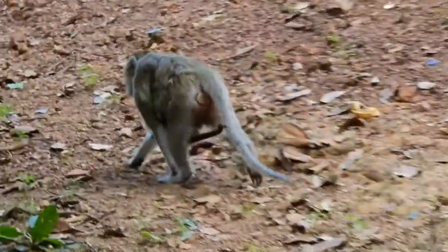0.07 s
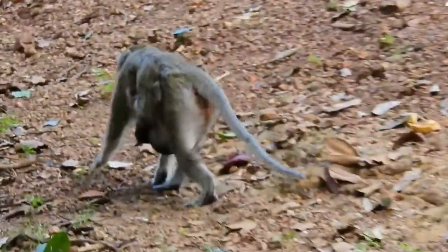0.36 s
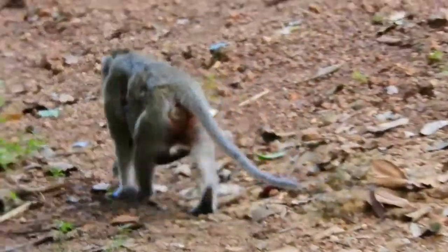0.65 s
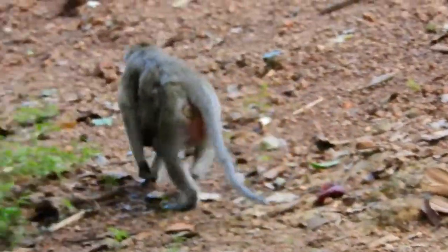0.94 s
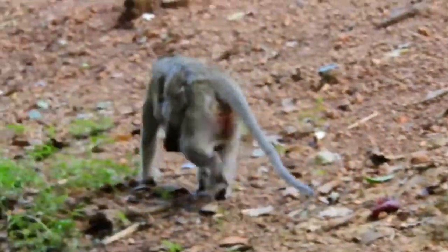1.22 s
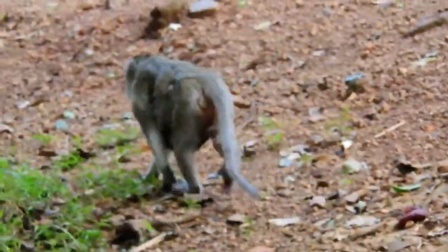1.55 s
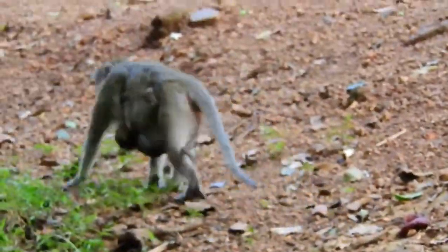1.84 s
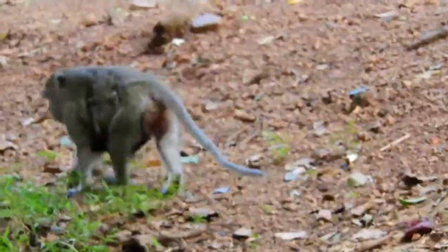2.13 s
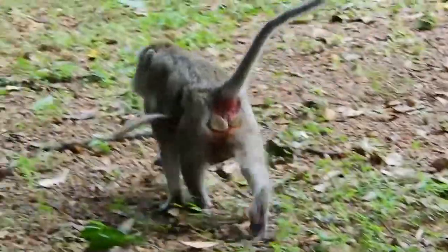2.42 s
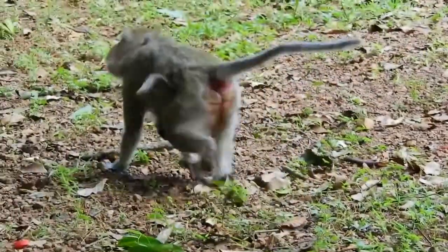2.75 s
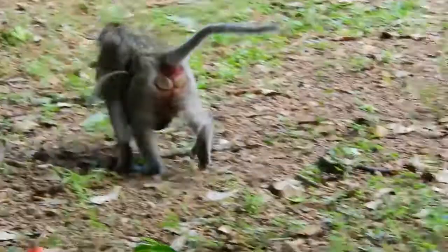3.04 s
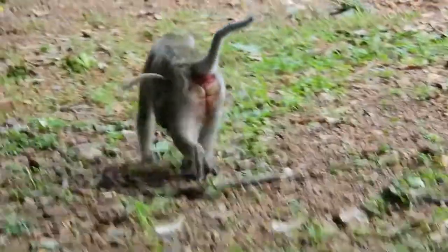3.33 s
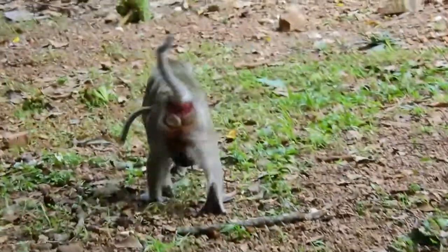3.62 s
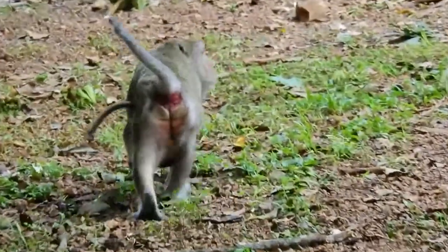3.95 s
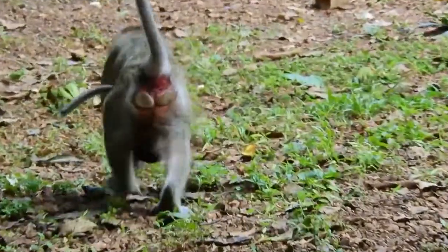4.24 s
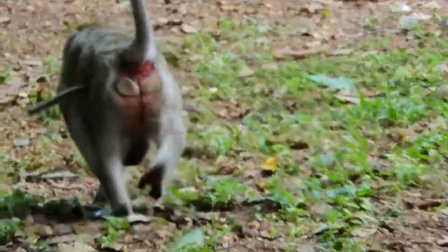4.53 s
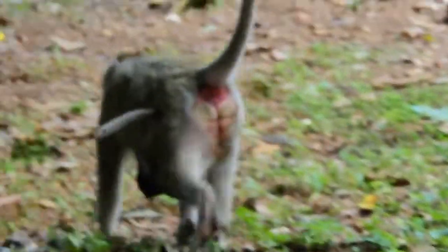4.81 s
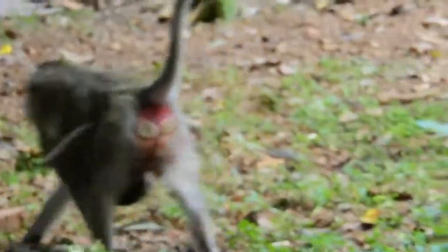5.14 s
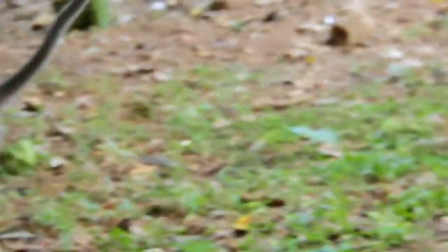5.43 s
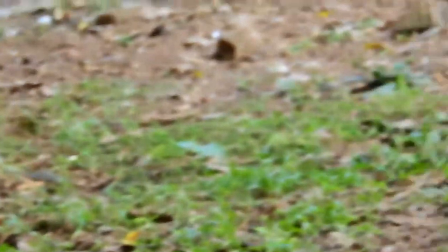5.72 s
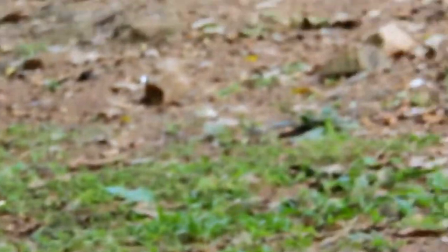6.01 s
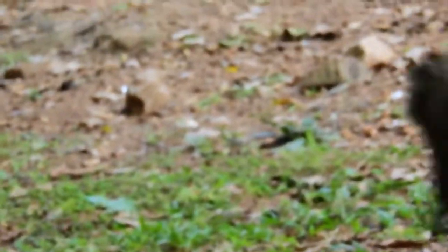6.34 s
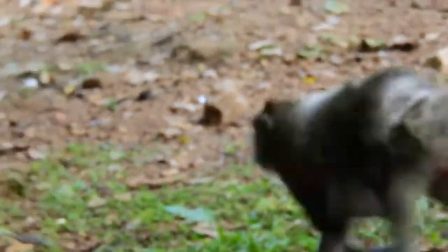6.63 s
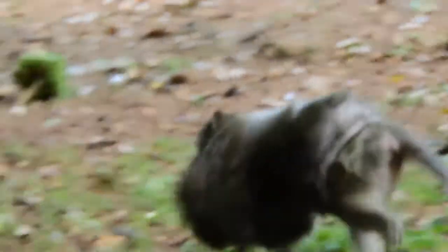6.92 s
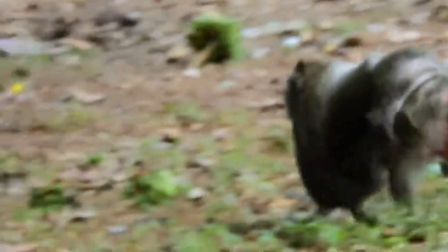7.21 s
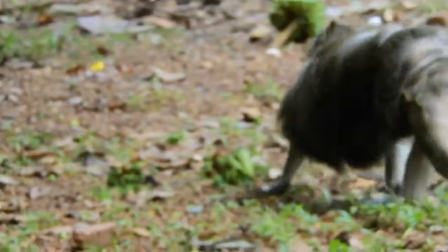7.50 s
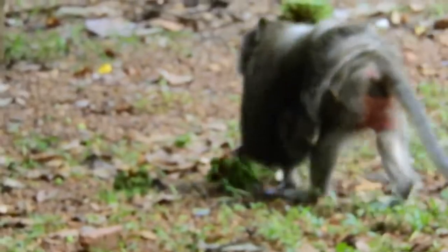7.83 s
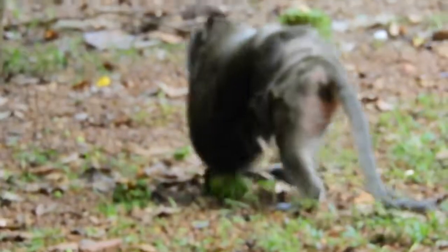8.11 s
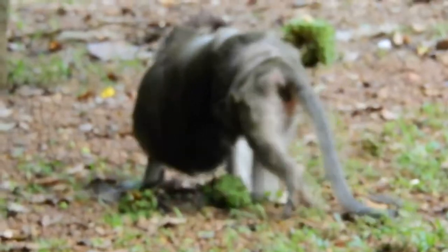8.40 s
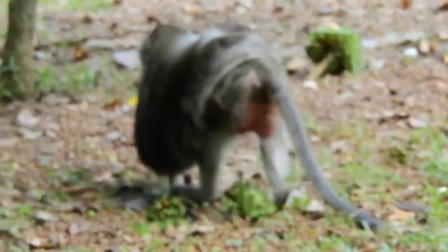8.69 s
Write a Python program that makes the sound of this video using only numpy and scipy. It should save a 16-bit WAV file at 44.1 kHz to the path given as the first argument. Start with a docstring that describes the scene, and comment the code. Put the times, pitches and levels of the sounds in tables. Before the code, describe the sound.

Outdoors among trees, distant traffic rumbles under a high hiss and a steady, shrill insect chorus. A far bird whistles once, faintly, at about 1.7 seconds. At 1.8 seconds everything cuts to silence, snapping back at 2.3 seconds with louder hiss and a single-cylinder motorbike some way off. Its slow, lumpy thump swells and sinks about once a second. Tyre roar builds, peaks around 4.5 to 5 seconds and shifts to the right, with a low boom lasting until about 6 seconds. A second motorbike with a quicker, tighter putter emerges near 5.5 seconds and passes at about 6.6, easing off as the tyre roar fades. The first drops away at 8 seconds, while the second putters loudest from there to the end, just before 9 seconds. From 2.4 seconds on, dry leaves tick occasionally nearby, joined by a few thin, raspy insect chirps between 4 and 8.5 seconds.

```python
"""Far traffic rumbles under a high hiss; in the trees insects shrill and a distant bird whistles once.
At 1.8 s the sound cuts out for half a second. Then two single-cylinder motorbikes roll past some
way off, their firings ringing the exhaust pipes as their tyre roar swells and fades.
The first thumps slowly and booms when close; dry leaves tick and insects chirp nearby.
The second, quicker and easing off, putters loudest at the end."""
import sys
import numpy as np
from scipy import signal
from scipy.fft import rfft, irfft
from scipy.io import wavfile
from scipy.ndimage import uniform_filter1d

SR = 44100
rng = np.random.default_rng(int(sys.argv[2]) if len(sys.argv) > 2 else 0)


def unload_audio(sound):
    """Save the sound as a 16-bit wav file, at the path given as the first command line argument."""
    columns = np.transpose(np.atleast_2d(sound))
    # keep every value between -1 and 1, then stretch to whole-number steps
    steps = np.round(np.clip(columns, -1, 1) * 32767)
    wavfile.write(sys.argv[1], SR, steps.astype(np.int16))


N = 386316
MUTE_FROM_S, MUTE_TO_S = 1.803, 2.306
FRAME, HOP = 1024, 256
TIME = np.arange(N) / SR
FRAME_TIME = np.arange(N // HOP + 2) * HOP / SR
BIN_HZ = np.maximum(np.fft.rfftfreq(FRAME, 1 / SR), 1)[:, None]
FINE_HZ = np.maximum(np.fft.rfftfreq(N, 1 / SR), 1)


def undb(db):
    """Decibels to gain."""
    return 10 ** (np.asarray(db) / 20)


def unit(x):
    """Scale to rms 1."""
    return x / np.sqrt(np.mean(x ** 2))


def colour(points, hz=FINE_HZ):
    """Gain through (Hz, dB) points, falling 30 dB per octave past the ends."""
    point_hz, db = np.transpose(points)
    octaves_outside = np.abs(np.log2(hz / np.clip(hz, point_hz[0], point_hz[-1])))
    return undb(np.interp(np.log(hz), np.log(point_hz), db) - 30 * octaves_outside)


def resonance(hz, width_hz):
    """Response of a band-pass applied twice."""
    return (1 + 1j * (FINE_HZ ** 2 - hz ** 2) / (FINE_HZ * width_hz)) ** -2


def through(x, response):
    """Filter by a frequency response."""
    return irfft(rfft(x) * response, N)


def walk(rate_hz):
    """Random steps smoothed twice; spread near 1."""
    hold = int(SR / rate_hz)
    steps = np.repeat(rng.standard_normal(N // hold + 1), hold)
    return 1.8 * uniform_filter1d(uniform_filter1d(steps, hold), hold)[:N]


def stereo_noise(wide_hz, bass_side):
    """Noise with channels alike in the bass, unrelated well above wide_hz."""
    mid, side = rng.standard_normal((2, N))
    share = np.clip(bass_side + FINE_HZ / (FINE_HZ + wide_hz), 0, 1)
    return mid + through(side, np.sqrt(share)) * np.array([[1], [-1]])


def panned(x, left_db):
    """Lean a sound to the left."""
    return x * undb(np.array([[.5], [-.5]]) * left_db)


def nearness(closest_s, width_s, t=TIME):
    """Inverse-square swell: 1 at closest_s, half at width_s either side."""
    return 1 / (1 + ((t - closest_s) / width_s) ** 2)


def crossover(middle_s, width_s, t=TIME):
    """Smooth step from 0 to 1."""
    return .5 + .5 * np.tanh((t - middle_s) / width_s)


# Traffic spectra before and after the silence: (frequency [Hz], level [dB])
TRAFFIC_EARLY_SPECTRUM = [(20, -17.5), (35, -11.5), (52, -2.5), (85, -0.5), (140, 2.5), (200, -5),
                          (270, -9.5), (380, -17.5), (700, -18.5), (1300, -19.5), (2000, -26), (3000, -30),
                          (4100, -36), (6000, -35.5)]
TRAFFIC_LATE_SPECTRUM = [(20, -22), (38, -12), (55, 2), (82, 2.5), (150, -2.5), (270, -7), (400, -18),
                         (700, -34)]

def far_traffic(early_db=-29, sag_db_per_s=1.0, late_db=-33, swell_db=2.5, crest_s=6.46, throb_db=2.0):
    """Far engines blur into a throbbing rumble that sinks, later swells and ebbs."""
    early = unit(through(stereo_noise(wide_hz=10000, bass_side=.012), colour(TRAFFIC_EARLY_SPECTRUM)))
    late = unit(through(stereo_noise(wide_hz=16000, bass_side=.066), colour(TRAFFIC_LATE_SPECTRUM)))
    swell = np.interp(TIME - crest_s, [-1.0, 0, 4.4], [0, 1, 0])
    early *= undb(early_db - sag_db_per_s * TIME + .5 * walk(18))
    late *= undb(late_db + swell_db * swell + throb_db * walk(20))
    return np.where(TIME < MUTE_TO_S, early, late)


# High, steady hiss with a faint top edge: (frequency [Hz], level [dB])
HISS_SPECTRUM = [(3180, -9), (5400, 4), (7540, 3.5), (8640, 8), (9140, 7.5), (11000, -5), (11900, -22),
                 (13000, -20.5), (15000, -37.5)]

def high_hiss(early_db=-46, early_sag_db_per_s=3.0, late_db=-36, late_sag_db_per_s=.66):
    """Wide, sinking hiss: one early rustle, louder after the silence, a swell as the bikes pass."""
    hiss = unit(through(stereo_noise(wide_hz=1497, bass_side=.026), colour(HISS_SPECTRUM)))
    rustle_db = 3 * nearness(.55, .049)
    swell_db = 4 * nearness(5.12, .78)
    level_db = np.where(TIME < MUTE_TO_S, early_db - early_sag_db_per_s * TIME + rustle_db,
                        late_db - late_sag_db_per_s * (TIME - MUTE_TO_S) + swell_db)
    return panned(hiss, left_db=-.6) * undb(level_db + .51 * walk(24))


# Insect band: (frequency [Hz], level [dB])
INSECT_SPECTRUM = [(3900, -17.5), (4200, -12.5), (4480, -3.5), (4780, -3), (5100, -6.5), (5500, -14),
                   (6200, -36.5)]

def insects(early_db=-43.5, late_db=-43):
    """A steady chorus in one narrow band."""
    chorus = unit(through(stereo_noise(wide_hz=20000, bass_side=.019), colour(INSECT_SPECTRUM)))
    return chorus * undb(np.where(TIME < MUTE_TO_S, early_db, late_db) + .5 * walk(29))


def far_bird(at_s=1.675, length_s=.17, note_hz=3675, level_db=-55.5, waver=.006):
    """One faint, wavering whistle."""
    envelope = np.exp(-(2 * (TIME - at_s) / length_s) ** 4)
    pitch_hz = note_hz * (1 + waver * walk(110))
    return undb(level_db) * envelope * np.sin(2 * np.pi * np.cumsum(pitch_hz) / SR)


def engine(running, scatter_db, jitter_s, gas_db, thumps=(), speed_m_s=10, sound_m_s=343):
    """One uneven pulse and a puff of gas per firing; Doppler bends the rate."""
    firing_hz, ease_hz_per_s, bend_s, bend_width_s, fires_at_s = running
    since_s = TIME - bend_s
    doppler = 1 - speed_m_s / sound_m_s * since_s / np.hypot(since_s, bend_width_s)
    cycles = np.cumsum((firing_hz - ease_hz_per_s * since_s) * doppler) / SR
    cycles -= np.interp(fires_at_s, TIME, cycles)
    firings = np.flatnonzero(np.diff(np.floor(cycles)))
    timing, strength = rng.standard_normal((len(firings), 2)).T
    strength_db = scatter_db * strength
    for at_s, db in thumps:
        strength_db[np.argmin(np.abs(firings - at_s * SR))] = db
    jittered = firings + (jitter_s * SR * timing).astype(int)
    pulses = np.zeros(N)
    pulses[np.clip(jittered, 0, N - 1)] = undb(strength_db)
    gas = rng.standard_normal(N) * np.exp(-(cycles % 1))
    return unit(pulses) + undb(gas_db) * unit(gas)


def exhaust(firing, modes, muffler_hz=430):
    """Firings ring the pipe; the muffler takes off the top."""
    pipe = sum(undb(db) * resonance(hz, width_hz) for hz, width_hz, db in modes)
    return unit(through(firing, pipe / (1 + (FINE_HZ / muffler_hz) ** 4)))


# Engine: (firing rate [Hz], easing [Hz/s], Doppler centre [s], half-width [s], one firing [s])
SLOW_RUNNING = (20.75, .024, 4.05, 1.0, 2.924)
# Accented firings: (time [s], level over a normal firing [dB])
SLOW_ACCENTS = [(2.365, 1), (2.455, 1), (2.595, 1), (2.735, 1), (2.925, 1), (3.017, 4.5), (3.16, 2.5),
                (3.255, 1.5), (3.73, 0), (4.165, 2), (4.31, 1), (4.6, 3), (5.83, 3)]
# Pipe resonances: (frequency [Hz], width [Hz], gain [dB])
SLOW_MODES = [(128.2, 66, -2.5), (170.3, 7.4, -4.5), (293.6, 115, -16)]
# Exhaust envelope: (time [s], level [dB])
SLOW_ENVELOPE = [(2.3, -26), (2.7, -24.7), (3.2, -25), (3.42, -26.5), (3.75, -21.8), (4.15, -24),
                 (4.38, -29), (4.62, -25), (4.95, -29), (5.3, -27), (5.72, -24), (6.15, -29), (6.5, -29),
                 (7.2, -31), (7.8, -31), (8.1, -45)]

def slow_bike():
    """The first bike's lumpy thump swells and sinks about once a second, then drops away."""
    firing = engine(SLOW_RUNNING, scatter_db=1.3, jitter_s=.0005, gas_db=-5.5, thumps=SLOW_ACCENTS)
    return exhaust(firing, SLOW_MODES) * undb(np.interp(TIME, *np.transpose(SLOW_ENVELOPE)))


# Engine: (firing rate [Hz], easing [Hz/s], Doppler centre [s], half-width [s], one firing [s])
QUICK_RUNNING = (32.667, 1.776, 6.6, .55, 8.3932)
# Pipe resonances, side-on and astern: (frequency [Hz], width [Hz], gain [dB])
QUICK_SIDE_MODES = [(62, 24, -8), (132, 64, 0), (182, 24, -12)]
QUICK_ASTERN_MODES = [(59, 24, -6), (152, 84, 0), (174, 26, -17)]
# Exhaust envelope: (time [s], level [dB])
QUICK_ENVELOPE = [(2.3, -43), (5.0, -33), (5.6, -29), (6.1, -30), (6.5, -26), (7.1, -26.3), (7.55, -28),
                  (7.75, -27.8), (7.92, -24), (8.2, -24), (8.42, -21.5), (8.76, -22.5)]

def quick_bike():
    """The second bike's tight putter: deep side-on, higher and louder once its exhaust points back."""
    firing = engine(QUICK_RUNNING, scatter_db=1.2, jitter_s=.00018, gas_db=-15)
    astern = crossover(middle_s=7.15, width_s=.15)
    putter = (1 - astern) * exhaust(firing, QUICK_SIDE_MODES)
    putter += astern * exhaust(firing, QUICK_ASTERN_MODES)
    return putter * undb(np.interp(TIME, *np.transpose(QUICK_ENVELOPE)))


def ground(comb_hz=445, rise_hz_per_s=420, rise_from_s=5.26, dull_hz=1150, dip_hz=445, dip_octaves=.44):
    """An inverted echo combs the roar, climbing after the pass; soft ground briefly absorbs one band."""
    spacing_hz = comb_hz + rise_hz_per_s * np.maximum(FRAME_TIME - rise_from_s, 0)
    echo = .44 * nearness(3.9, 1.8, FRAME_TIME) / (1 + (BIN_HZ / dull_hz) ** 8)
    dip_db = 7 * np.exp(-(np.log2(BIN_HZ / dip_hz) / dip_octaves) ** 2) * nearness(5.18, .24, FRAME_TIME)
    return np.abs(1 - echo * np.exp(2j * np.pi * BIN_HZ / spacing_hz)) * undb(-dip_db)


def turbulence(size_hz=70, size_s=.53, spread_db=2.14):
    """Turbulent air fades narrow bands in and out."""
    field = rng.standard_normal((len(BIN_HZ), len(FRAME_TIME)))
    for axis, span in enumerate((size_hz * FRAME / SR, size_s * SR / HOP)):
        field = signal.lfilter([1], [1, -np.exp(-1 / span)], field, axis=axis)
    return undb(spread_db * unit(field))


def brighten(gain, far_db=-7.5, shelf_hz=1750):
    """Treble against a normalised body: extra hiss just after the silence, bright close, dull afar."""
    hz = BIN_HZ[:, 0]
    body_power = np.sum(gain[(hz > 450) & (hz < 1600)] ** 2, axis=0)
    treble_power = np.sum(gain[(hz > 2000) & (hz < 4000)] ** 2, axis=0)
    opening_hiss_db = 5 * nearness(2.2, .56, FRAME_TIME)
    close_db = 5.5 * nearness(5.16, .53, FRAME_TIME)
    lift = undb(far_db + opening_hiss_db + close_db) * np.sqrt(body_power / treble_power)
    shelf = lift ** (1 / (1 + (shelf_hz / BIN_HZ) ** 4))
    return gain * shelf * np.sqrt(len(hz) / body_power)


# Tread bands: (time [s], half-width [s], frequency [Hz], glide [Hz/s], half-width [Hz], lift [dB])
SINGING_BANDS = [(3.0, .3, 635, 0, 45, 5.5), (2.8, .6, 1800, 0, 200, 3.5), (2.8, 0.5, 3800, 0, 790, 3),
                 (3.7, 0.17, 1260, -100, 180, 6), (4.65, .45, 630, 0, 45, 3), (4.6, .5, 1070, 0, 65, 4.5),
                 (4.44, 0.29, 2460, -100, 120, 7), (4.7, 0.32, 1900, 0, 220, 2.5),
                 (5.6, 0.2, 4300, 0, 1100, 2), (6.98, 0.24, 820, -280, 170, 5), (8.6, .4, 2450, 0, 450, 3)]

def tread_song():
    """Gain of bands that briefly sing out of the roar, some sliding down."""
    lift_db = 0
    for at_s, width_s, hz, glide_hz_per_s, width_hz, db in SINGING_BANDS:
        centre_hz = hz + glide_hz_per_s * (FRAME_TIME - at_s)
        band = np.exp(-((BIN_HZ - centre_hz) / width_hz) ** 2)
        lift_db += db * band * nearness(at_s, width_s, FRAME_TIME)
    return undb(lift_db)


# Tyre roar of the first bike, the second, and the second receding: (frequency [Hz], level [dB])
SLOW_TYRE_SPECTRUM = [(260, 5), (330, -2), (420, -2), (520, 3.5), (630, 0), (760, 1.5), (900, 0),
                      (1080, -2), (1400, -1), (1950, -1.5), (2230, -4), (2480, -4), (3100, -9),
                      (4200, -14.5), (7000, -22.5)]
QUICK_TYRE_SPECTRUM = [(280, -14), (400, -8.5), (480, -7), (570, -3.5), (720, -2), (950, -0.5), (1200, -7),
                       (1750, -7), (3000, -14), (4200, -19)]
RECEDING_SPECTRUM = [(260, -8), (450, -4.5), (725, -7), (842, -7.5), (1050, -5.5), (1400, -6.5), (1790, -7),
                     (2500, -12.5), (3320, -13.5), (4200, -18), (5460, -50)]
# Pass of each bike: (closest time [s], half-width [s], gain [dB])
TYRE_PASSES = [(4.65, 1.0, -29), (6.68, 1, -37)]

def tyres(handover_s=6.56, receding_s=7.0, blend_s=.78, swing_s=5, flutter_db=.5):
    """Tread roar swells with each pass and swings right; the second bike's colour takes over."""
    gain = ground() * colour(SLOW_TYRE_SPECTRUM, BIN_HZ)
    for at_s, spectrum in ((handover_s, QUICK_TYRE_SPECTRUM), (receding_s, RECEDING_SPECTRUM)):
        share = crossover(at_s, blend_s, FRAME_TIME)
        gain = (1 - share) * gain + share * colour(spectrum, BIN_HZ)
    gain = brighten(gain * turbulence()) * tread_song()
    noise = stereo_noise(wide_hz=16000, bass_side=.025)
    frames = signal.stft(noise, nperseg=FRAME, noverlap=FRAME - HOP)[2]
    frames *= gain[:, :frames.shape[-1]]
    roar = signal.istft(frames, nperseg=FRAME, noverlap=FRAME - HOP)[1][:, :N]
    left_db = -1.35 - 6.5 * crossover(swing_s, .43) * nearness(swing_s, 1.95)
    power = sum(undb(db) ** 2 * nearness(at_s, width_s) for at_s, width_s, db in TYRE_PASSES)
    return panned(roar, left_db) * np.sqrt(power) * undb(flutter_db * walk(10))


# Leaf ticks: (time [s], level [dB])
LEAF_TICKS = [(2.4233, -34), (3.0302, -34), (4.7252, -37), (5.1357, -31), (6.1664, -32.5), (6.4017, -33),
              (7.5136, -39), (7.784, -39)]

def leaves(decay_s=.018):
    """Each dry leaf gives a short, bright crackle."""
    bursts = np.zeros((2, N))
    envelope = np.exp(-TIME[:FRAME] / decay_s)
    for at_s, db in LEAF_TICKS:
        start = int(at_s * SR)
        bursts[:, start:start + FRAME] += undb(db) * envelope * rng.standard_normal((2, FRAME))
    return through(bursts, unit(colour([(6000, -10), (8800, 0), (10500, -8), (12000, -30)])))


# Body booms: (time [s], half-length [s], frequency [Hz], width [Hz], level [dB])
BODY_BOOMS = [(4.5, .45, 215, 80, -35), (5.25, .4, 235, 108, -31.5), (5.35, 0.59, 72, 40, -32.5)]

def body_boom():
    """The first bike's body booms in low bands while it is close."""
    out = np.zeros((2, N))
    for at_s, half_s, hz, width_hz, db in BODY_BOOMS:
        band = unit(through(stereo_noise(wide_hz=5000, bass_side=.013), resonance(hz, width_hz)))
        out += band * undb(db) / np.sqrt(1 + ((TIME - at_s) / half_s) ** 4)
    return out


# Insect chirps: (time [s], length [s], level [dB])
INSECT_CHIRPS = [(4.145, .17, -53), (5.2, 0.13, -49), (5.485, 0.22, -49), (6.106, 0.22, -48.5),
                 (8.173, 0.25, -46)]

def chirps(start_hz=12600, fall_hz_per_s=1700, width_hz=330, attack_s=.01, rasp_db=2):
    """Thin, raspy insect chirps start sharply, sag in pitch and die away."""
    out = np.zeros((2, N))
    grain = through(rng.standard_normal((2, N)), 1 / (1 + (FINE_HZ / width_hz) ** 2))
    grain = unit(grain * undb(rasp_db * walk(70)))
    for at_s, length_s, db in INSECT_CHIRPS:
        since_s = np.clip(TIME - at_s, 0, length_s)
        envelope = np.minimum(since_s / attack_s, 1) * (1 - (since_s / length_s) ** 2)
        tone = np.sin(2 * np.pi * (start_hz - .5 * fall_hz_per_s * since_s) * since_s)
        out += undb(db) * envelope * grain * tone
    return out


def scene():
    """The road from among the trees; the bikes sound only after the silence."""
    bikes = (slow_bike() + quick_bike() + tyres() + body_boom()) * (TIME > MUTE_TO_S)
    return bikes + far_traffic() + high_hiss() + insects() + chirps() + leaves() + far_bird()


def record(dry, fade_s=.025, snap_s=.003, top_hz=15500):
    """Fade quickly into half a second of silence, snap back, and cut the top."""
    corners_s = [0, snap_s, MUTE_FROM_S - fade_s, MUTE_FROM_S, MUTE_TO_S, MUTE_TO_S + snap_s]
    gate = np.interp(TIME, corners_s, [0, 1, 1, 0, 0, 1])
    lowpass = signal.ellip(8, .2, 70, top_hz, fs=SR, output="sos")
    return signal.sosfilt(lowpass, dry * gate)


dry = scene()
out = record(dry)
unload_audio(out)
```